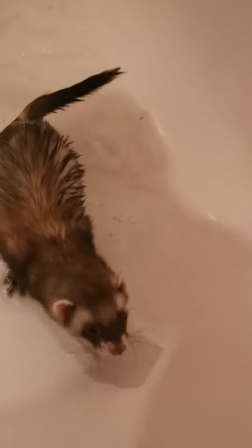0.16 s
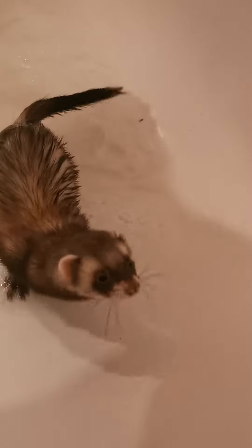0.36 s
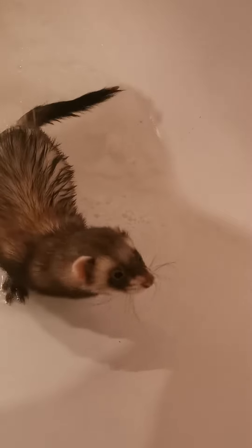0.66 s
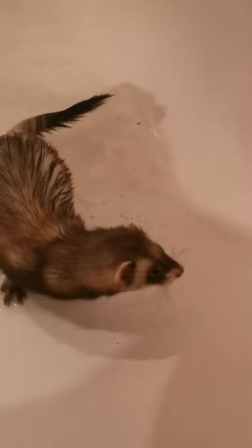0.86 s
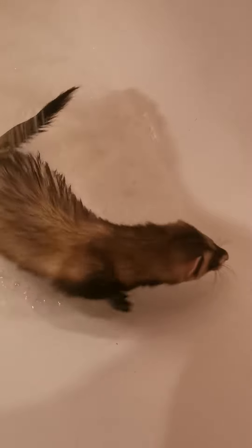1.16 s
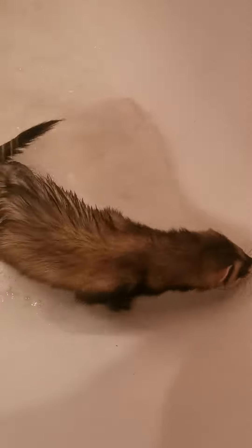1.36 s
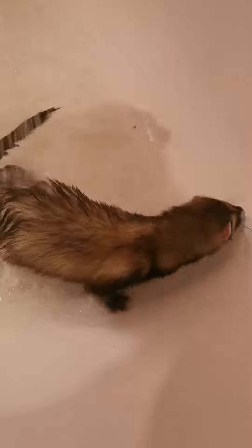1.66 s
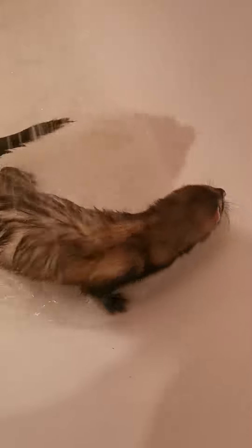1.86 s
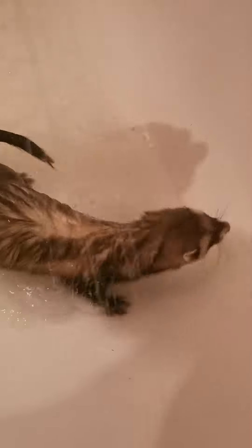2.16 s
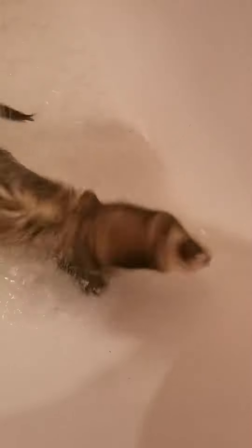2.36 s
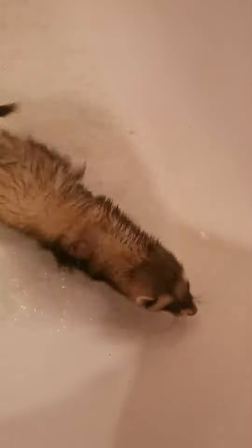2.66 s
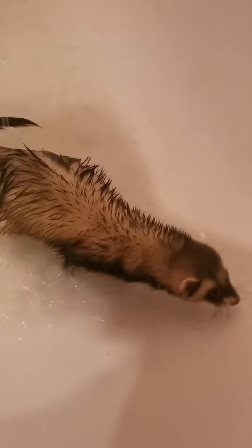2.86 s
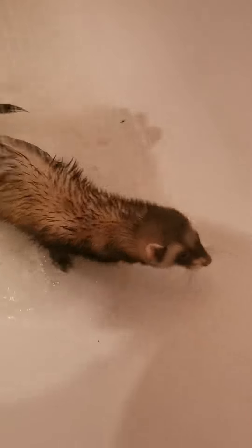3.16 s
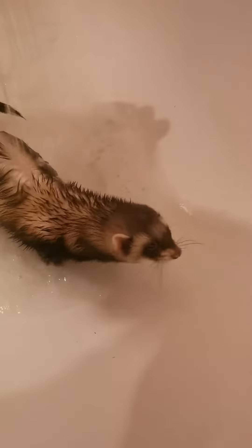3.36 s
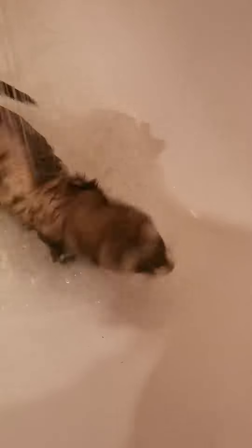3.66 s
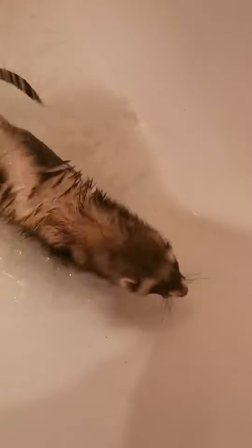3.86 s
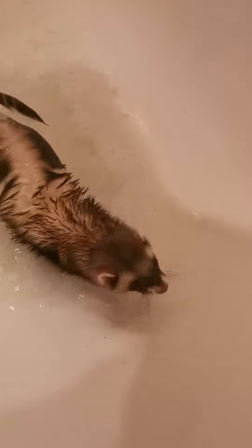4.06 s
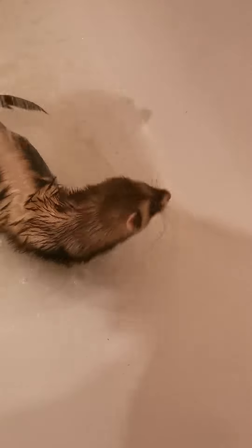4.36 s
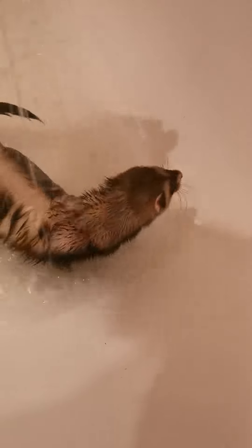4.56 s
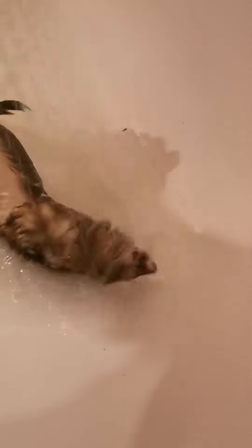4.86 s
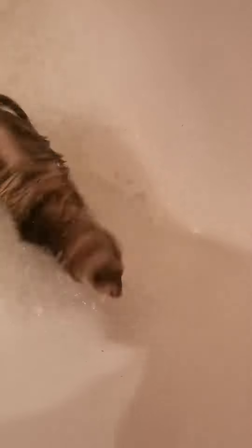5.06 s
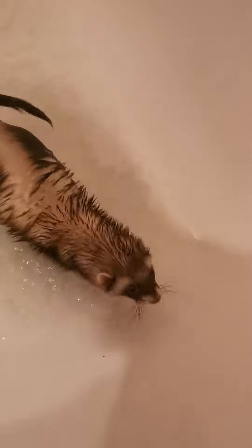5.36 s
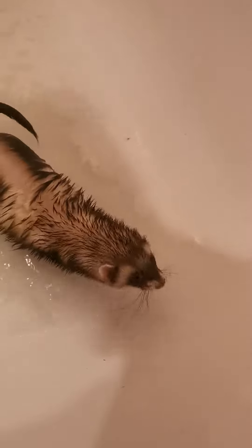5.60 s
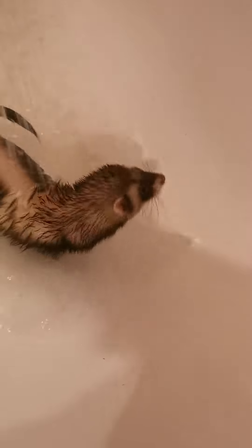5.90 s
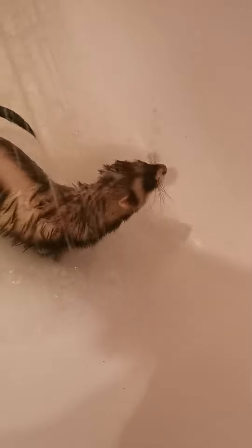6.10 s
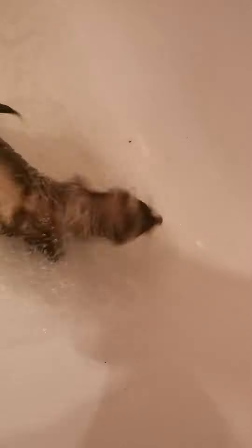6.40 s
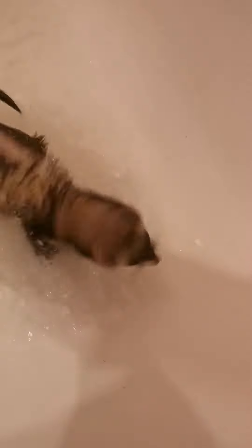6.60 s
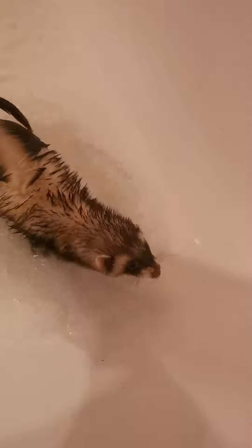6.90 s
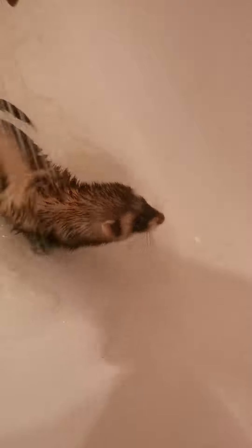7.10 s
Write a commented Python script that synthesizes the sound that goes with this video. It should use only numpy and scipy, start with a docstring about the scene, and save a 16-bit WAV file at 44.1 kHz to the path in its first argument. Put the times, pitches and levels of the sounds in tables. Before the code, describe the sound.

Continuous shower spray in a bathtub, heard close with a short bright room echo. It begins with strong drumming and hiss, thins and becomes muffled around two seconds as fur catches the water, then surges again and keeps fluctuating. Plopping drips, small watery slaps, bubbles and crisp droplet ticks dot it. A deep, steady fan hum and faint handling rumble lie below, with occasional knocks on the tub.

```python
"""In a bathroom with a humming extractor fan, a hand-held shower plays over a small animal in a bathtub.
The wandering jet drums on the tub, splashes in shallow water, hisses on bare floor and is muffled by fur:
random drop impacts are split into coloured stereo bands whose levels follow the jet.
Damped and gliding sines make close ticks, plopping drips, gurgles and knocks on the tub; filtered bursts
make slaps and swishes. Steady tones and filtered noise make the fan, and low noise the handling rumble."""
import sys
import numpy as np
from scipy import signal
from scipy.io import wavfile

SR = 44100
rng = np.random.default_rng(int(sys.argv[2]) if len(sys.argv) > 2 else 0)


def digitize_waveform(pressure):
    """Quantize a signal to 16-bit integers and store it at the path in sys.argv[1].

    Rows of a 2-D input are taken as channels; values are limited to [-1, 1].
    """
    field = np.atleast_2d(pressure).T
    bounded = np.clip(field, -1, 1)
    quanta = np.round(bounded * 32767).astype(np.int16)
    wavfile.write(sys.argv[1], SR, quanta)


N = 319284

# colour of fine spray: (frequency [Hz], level per Hz [dB])
SPRAY_COLOUR = [(1500, -5), (3250, -4.5), (3900, 2), (5400, 2), (7050, 3.5), (7600, -1), (10050, -1.5),
                (10600, 1.5), (12600, -2), (13900, -6.5), (15800, -8.5)]
# the jet drums on a patch of the tub: (from [s], to [s], level [dB], pitch of the patch [Hz])
DRUM_ROLLS = [(0.155, 0.723, -38, 1230), (0.715, 1.243, -38, 940), (1.46, 1.492, -35, 1190),
              (2.7, 3.13, -37.5, 960), (3.312, 3.684, -37, 890), (4.275, 4.302, -39, 710),
              (4.61, 4.66, -42, 1190), (5.25, 5.288, -44.5, 1360), (5.475, 5.615, -40, 1250),
              (6.03, 6.1, -43, 1150), (6.365, 6.38, -51, 1090), (6.884, 6.918, -45.5, 1230)]
# resting level of the hiss between the sweeps onto bare floor
HISS_DB = -39


def from_db(db):
    """Decibels to gain."""
    return 10 ** (np.asarray(db) / 20)


def rms_one(x):
    """Scale to unit rms."""
    return x / np.sqrt(np.mean(x ** 2) + 1e-20)


def in_time(rows):
    """Each column of a curve at every sample."""
    s, *columns = np.transpose(rows)
    return [np.interp(np.arange(N) / SR, s, c) for c in columns]


def at_hz(points, hz):
    """Read a spectrum on a log-frequency axis."""
    table_hz, values = np.array(points).T
    return np.interp(np.log(hz), np.log(table_hz), values)


def pan(db):
    """Left and right gains for a level difference; positive leans left."""
    return from_db(np.array([[.5], [-.5]]) * db)


def butter(x, hz, kind, order=2):
    """Butterworth filter."""
    sos = signal.butter(order, np.clip(hz, 10, .48 * SR), kind, fs=SR, output="sos")
    return signal.sosfilt(sos, x + 1e-18)


def drift(rate):
    """Slow random wander with spread 1; a higher rate in Hz wanders faster."""
    step = 40  # samples between the points of the wander
    r = np.exp(-2 * np.pi * rate * step / SR)
    slow = signal.lfilter([1], [1, -2 * r, r * r], rng.standard_normal(N // step + 2002))
    slow = rms_one(slow[2000:])  # without the filter's start-up
    return np.interp(np.arange(N) / step, np.arange(len(slow)), slow)


def swell(start, end, rise_s, fall_s):
    """Eases up to 1 at start, holds until end, eases back to 0."""
    t = np.arange(N) / SR
    ramp = np.clip(np.minimum(1 + (t - start) / rise_s, 1 - (t - end) / fall_s), 0, 1)
    return np.sin(np.pi / 2 * ramp) ** 2


def level_of(swells, resting_db):
    """Level in dB of a resting sound with the power of swells added, each given as (dB, shape)."""
    power = sum((from_db(db) * shape) ** 2 for db, shape in swells)
    return 10 * np.log10(from_db(resting_db) ** 2 + power)


def ring(s, hz, t60, rise=0):
    """A damped sine that starts at time s; its pitch climbs by the share rise within t60."""
    out, start = np.zeros(N), int(s * SR)
    t = np.arange(min(int(2 * t60 * SR), N - start)) / SR
    tone = np.sin(2 * np.pi * hz * t * (1 + .5 * rise * t / t60))
    out[start:start + len(t)] = tone * from_db(-60 * t / t60)
    return out


def chirp(hz, cycles):
    """A tiny bubble swells and dies within a few cycles, rising slightly in pitch; 4 ms long."""
    t = np.arange(int(.004 * SR)) / SR - .0013  # strongest at 1.3 ms
    turns = hz * t
    return np.exp(-(2 * turns / cycles) ** 2) * np.sin(2 * np.pi * turns * (1 + .003 * turns))


def drops(per_s, spread_db):
    """Random impacts, mostly small; each has its own balance and polarity in the two channels."""
    at = np.flatnonzero(rng.random(N) < per_s / SR)
    sizes = from_db(spread_db * np.minimum(rng.exponential(1, N), 5))
    angle = rng.uniform(0, 2 * np.pi, N)[at]
    out = np.zeros((2, N))
    out[:, at] = sizes[at] * np.array([np.cos(angle), np.sin(angle)])
    return rms_one(out)


def bands(spectrum, excite, count):
    """Split an excitation into coloured stereo bands, as (Hz, band); before panning their powers add to 1."""
    # left-right likeness: (frequency [Hz], correlation, limited to -1..1 below [-])
    likeness = [(60, 15), (160, 0.5), (350, 3), (700, 0.1), (1200, 0.5), (1800, -0.3), (3000, 0.08),
                (15000, 0)]
    # stereo balance: (frequency [Hz], left over right [dB])
    balance = [(100, 10), (180, 8), (280, 0), (700, -1), (1400, -5.5), (2800, -0.5), (5000, 2.5), (9000, 1),
               (15000, -3.5)]
    edges = np.geomspace(spectrum[0][0], spectrum[-1][0], count + 1)
    centres = np.sqrt(edges[1:] * edges[:-1])
    gains = from_db(at_hz(spectrum, centres)) * np.sqrt(np.diff(edges))
    gains /= np.linalg.norm(gains)
    for low, high, hz, gain in zip(edges, edges[1:], centres, gains):
        mid, side = butter(excite(), [low, high], "band")
        alike = np.clip(at_hz(likeness, hz), -1, 1)
        both = np.sqrt(1 + alike) * mid + np.sqrt(1 - alike) * side * [[1], [-1]]
        yield hz, gain * rms_one(both) * pan(at_hz(balance, hz))


def bathroom(x, wet_db, wall_hz=7000):
    """Hard walls add a dense, short tail, a little duller than the direct sound."""
    room_t60_s = 0.19
    t = np.arange(SR // 2) / SR
    late = t > .003  # the walls answer after 3 ms
    tail = rng.standard_normal((2, len(t))) * from_db(-60 * t / room_t60_s) * late
    tail = butter(tail / np.linalg.norm(tail[0]), wall_hz, "low", order=1)
    return x + from_db(wet_db) * signal.fftconvolve(x, tail, axes=1)[:, :N]


def around_jet(x, wet_db, count=3):
    """The echoes keep changing as the jet wanders: several room tails are mixed in drifting shares."""
    shares = np.array([drift(2.43) for k in range(count)])
    shares /= np.linalg.norm(shares, axis=0)
    return x + sum(share * (bathroom(x, wet_db) - x) for share in shares)


def fan():
    """The motor hums near 100 Hz with weaker tones above; moving air stirs the room's low resonances."""
    # motor tones: (frequency [Hz], rms level before waver and pan [dB], left over right [dB], waver [dB])
    motor_tones = [(99.7, -31, 4, 1), (174, -63, 4, 7.5), (321.4, -66, -7.5, 2), (458.4, -72, 1, 10),
                   (521.5, -48.5, -10, 0.9), (635, -68, -19, 3.5)]
    # room resonances stirred by the fan: (frequency [Hz], width [Hz], rms level before pan [dB])
    room_modes = [(88.2, 6.8, -44), (121.9, 12.7, -44.5), (146.4, 6.5, -49.5)]
    # colour of the moving air: (frequency [Hz], level per Hz [dB])
    air_colour = [(60, 6.5), (150, 11.5), (240, -10), (330, 2), (450, 2), (800, -2), (2000, -69)]
    t = np.arange(N) / SR
    hum = 0
    for hz, db, side_db, waver_db in motor_tones:
        tone = np.sqrt(2) * np.sin(2 * np.pi * (hz * t + rng.random()))
        hum = hum + tone * from_db(db + waver_db * drift(1.97)) * pan(side_db)
    boom = 0
    for hz, width, db in room_modes:
        mode = butter(rng.standard_normal(N), [hz - width / 2, hz + width / 2], "band")
        boom = boom + from_db(db) * rms_one(mode)
    air = sum(band for hz, band in bands(air_colour, lambda: rng.standard_normal((2, N)), count=10))
    return hum + boom * pan(2.6) + from_db(-47.5) * air


def handling():
    """The hand on the microphone rumbles faintly, as low band noise that swells when the grip shifts."""
    # shifts of the hand: (from [s], to [s], level [dB])
    grip_shifts = [(2.4, 2.65, -52), (3.65, 3.9, -51), (5.05, 5.25, -48), (6.5, 6.8, -54)]
    fade_s, holding_db = 0.11, -57.5
    grips = [(db, swell(start, end, fade_s, fade_s)) for start, end, db in grip_shifts]
    # a part shared by both channels and a part of each one's own
    rumble = rng.standard_normal(N) + 0.43 * rng.standard_normal((2, N))
    rumble = rms_one(butter(rumble, [36, 72], "band"))
    return from_db(level_of(grips, holding_db)) * rumble * pan(3.9)


def thrum(hiss_db):
    """Water on the animal's body thrums dully; the more of the jet hisses on bare floor, the less is left."""
    resting_db, loss_per_hiss_db = -54, 2.7
    left, right = butter(drops(per_s=500, spread_db=3.0), (172, 310), "band", order=3)
    dull = rms_one(left + .5 * right * [[1], [-1]])
    return dull * from_db(resting_db - loss_per_hiss_db * np.maximum(hiss_db - HISS_DB, 0))


def knocks(thump_t60=0.005, wall_db=-11, lowest_hz=450):
    """Each blow is a short thump and rings the tub wall; a soft contact leaves out the upper modes."""
    # blows on the tub: (time [s], peak level before pan and room [dB], pitch of the contact [Hz])
    blows = [(0.7162, -22, 1040), (2.5583, -21, 940), (2.57, -19.5, 900), (5.1712, -16.5, 2680),
             (5.329, -24.5, 2760)]
    # modes of the tub wall: (frequency [Hz], relative level [dB], decay by 60 dB [s])
    wall_modes = [(460, -19, 0.026), (636, -17, 0.013), (930, -2.5, 0.024), (1470, 1, 0.019),
                  (2290, -30, 0.036), (2870, -6.5, 0.028)]
    out = 0
    for s, db, contact_hz in blows:
        wall = sum(rng.choice([-1, 1]) * from_db(mode_db) * ring(s, hz, t60)
                   for hz, mode_db, t60 in wall_modes)
        blow = ring(s, contact_hz, thump_t60) + from_db(wall_db) * wall
        blow = butter(blow, 2 * contact_hz, "low")
        blow = butter(blow, lowest_hz, "high")
        out = out + from_db(db) * blow / np.abs(blow).max()
    return bathroom(out * pan(-2.2), wet_db=4.0)


def plops(rise=0.02, splat=0.32, splat_t60=0.034):
    """A fat drip splats and traps a larger bubble, whose pitch climbs as it nears the surface."""
    # drips in the shallow water: (time [s], relative level [dB], pitch [Hz], decay by 60 dB [s])
    drips = [(1.711, -25.5, 1144, 0.048), (1.9, -33, 1570, 0.034), (2.067, -37, 1443, 0.15),
             (2.203, -28, 1570, 0.031), (2.338, -21.5, 1086, 0.038), (2.363, -35, 1040, 0.05),
             (3.004, -26, 866, 0.042), (3.902, -29.5, 1313, 0.087), (4.773, -24.5, 1067, 0.061),
             (4.788, -28, 1025, 0.05), (4.843, -29.5, 1350, 0.032), (5.109, -21, 1386, 0.04),
             (5.81, -30, 1030, 0.094)]
    out, t = np.zeros(N), np.arange(N) / SR
    for s, db, hz, t60 in drips:
        decay = (t > s) * from_db(-60 * np.clip((t - s) / splat_t60, 0, 5))
        spatter = rng.standard_normal(N) * np.sqrt(SR / hz) * decay
        drip = butter(ring(s, hz, t60, rise) + splat * spatter, [.8 * hz, 1.3 * hz], "band")
        out = out + from_db(db - 5.5) * drip
    return bathroom(out * pan(-2.8), wet_db=-2.5)


def slaps():
    """A gout of water slaps into the puddle as a quick, dying run of droplets popping around one pitch."""
    # gouts: (time [s], rms level at the start before pan and room [dB], pitch [Hz])
    gouts = [(0.869, -29.5, 930), (0.942, -29.5, 1010), (1.203, -30, 940), (1.424, -37, 1390),
             (1.733, -34.5, 2370), (3.3, -36, 1440), (4.53, -36, 2200), (4.948, -35.5, 2350),
             (5.176, -38, 2600), (5.332, -30.5, 2570), (5.466, -33.5, 1660), (5.518, -38, 1540),
             (6.015, -35, 2150), (6.036, -30, 1410), (6.255, -33.5, 945), (6.328, -35.5, 1250),
             (6.372, -31, 1120), (6.409, -39, 1140)]
    t60_s, octaves = 0.18, 0.8
    half = 2 ** (octaves / 2)
    out, t = np.zeros((2, N + SR)), np.arange(SR // 4) / SR
    droplets = drops(per_s=2800, spread_db=1.0)
    for s, db, hz in gouts:
        start = int(s * SR)
        run = np.roll(droplets, -start, axis=1)[:, :len(t)]
        run = rms_one(butter(run, [hz / half, hz * half], "band"))
        out[:, start:start + len(t)] += from_db(db - 60 * t / t60_s) * run
    return bathroom(out[:, :N] * pan(-1.0), wet_db=-2)


def swishes(width_octaves=0.11):
    """Over a thin film, tiny bubbles of nearly one size fizz together; the pitch climbs as it thins."""
    # crossings of the film: (from [s], to [s], level [dB], first pitch [Hz], last pitch [Hz])
    film_crossings = [(3.96, 4.006, -46, 4870, 4900), (6.03, 6.332, -46.5, 4400, 6100)]
    fade_s = 0.035
    glide, strength = [], 0
    for start, end, db, first_hz, last_hz in film_crossings:
        glide += [(start, first_hz), (end, last_hz)]
        strength = strength + from_db(db) * swell(start, end, fade_s, fade_s)
    centre, = in_time(glide)
    out = 0
    for hz, band in bands(SPRAY_COLOUR[1:6], lambda: drops(per_s=1700, spread_db=6.5), count=10):
        nearness = np.exp(-.5 * (np.log2(hz / centre) / width_octaves) ** 2)
        out = out + band / band.std() * nearness
    return rms_one(out) * strength


def pockets():
    """Drops keep ringing the air pocket dug by the jet, whose pitch slides as its size changes."""
    # pockets: (from [s], to [s], level [dB], first pitch [Hz], last pitch [Hz], width [Hz])
    air_pockets = [(0.75, 1.278, -42, 905, 865, 85), (1.798, 2.078, -51.5, 1540, 1510, 130),
                   (3.537, 3.74, -46.5, 905, 735, 80), (4.017, 4.167, -41, 2110, 1900, 600),
                   (4.158, 4.283, -37.5, 1310, 900, 480), (4.44, 4.65, -47, 1550, 1310, 450),
                   (5.507, 5.597, -40.5, 1450, 1050, 380), (6.06, 6.355, -48, 2320, 2250, 550),
                   (6.192, 6.225, -39.5, 1520, 1580, 300)]
    fade_s = 0.05
    out, t = np.zeros((2, N)), np.arange(N) / SR
    pelting = drops(per_s=1600, spread_db=2.0)
    for start, end, db, first_hz, last_hz, width_hz in air_pockets:
        shape = swell(start, end, fade_s, fade_s)
        on = shape > 0
        pitch = np.interp(t[on], [start, end], [first_hz, last_hz])
        turn = np.exp(2j * np.pi * np.cumsum(pitch) / SR)
        # shift the pitch to zero, filter, shift back: a band that glides
        rung = butter(pelting[:, on] / turn, width_hz / 2, "low") * turn
        out[:, on] += from_db(db) * shape[on] * rms_one(rung.real)
    return out * pan(-2.5)


def gurgles(splash_db, per_s=45, gain_db=0.5, spread_db=5.5, lowest_hz=1200, octaves=2.5, cycles=45, rise=0.2):
    """Some of the splashes trap a bubble that rings on its own and climbs in pitch."""
    gap, size, pitch, side = rng.random((700, 4)).T
    times = np.cumsum(-np.log(gap)) / per_s
    out = np.zeros((2, N + SR))
    for s, big, high, right in zip(times, size, pitch, side):
        start, hz = int(s * SR), lowest_hz * 2 ** (octaves * high)
        if start < N:
            # age runs from 0 to 1 over the bubble's life
            age = np.arange(int(cycles / hz * SR)) * hz / (cycles * SR)
            bubble = np.sin(2 * np.pi * cycles * age * (1 + .5 * rise * age)) * from_db(-60 * age)
            db = splash_db[start] + gain_db - spread_db * np.log(big + 0.12)
            out[:, start:start + len(age)] += from_db(db) * pan(4 - 12 * right) * bubble
    return bathroom(out[:, :N], wet_db=5.0)


def ticks(spray_db, cycles=8.7, per_s=45, small_db=-1.0, spread_db=2.0, snap=0.47, snap_hz=11200, snap_cycles=2.4):
    """Drops burst close by: set loud ones, and many small ones that fade when the spray is muffled.
    The finer the drop, the harder the snap of its impact."""
    # loud drops: (time [s], relative level [dB], pitch [Hz], relative left over right [dB])
    loud_drops = [(0.0817, -19, 12400, -10), (0.1072, -19, 10800, -8), (0.2314, -17.5, 6570, -4.0),
                  (0.6085, -18.5, 6750, -6), (0.6843, -19, 11000, -8), (1.6307, -22, 10800, -4),
                  (1.8567, -26.5, 4280, 0), (2.1954, -30.5, 4000, -9), (2.2318, -25, 11600, -10),
                  (2.2822, -21, 11300, -14), (2.3431, -23.5, 4180, -8.5), (2.4853, -23.5, 10700, -11),
                  (2.5272, -21.5, 6540, -2), (2.6435, -20.5, 4700, -1), (2.9088, -23, 10800, -4),
                  (3.0555, -26.5, 4980, -3), (3.4007, -26, 3620, -3), (3.8427, -17.5, 6100, 11),
                  (3.8896, -19.5, 10700, -3), (3.9389, -22, 6640, 5), (4.348, -22.5, 3300, 2),
                  (4.7102, -21.5, 6330, -2), (4.803, -26.5, 6300, -10), (4.808, -23, 11400, -13),
                  (4.853, -26, 6330, -13), (5.5278, -20, 7100, -3.5), (5.8042, -19, 12300, -10),
                  (6.1809, -24.5, 4800, 2), (6.2682, -22, 5640, -8.0), (6.2851, -18, 6400, -7),
                  (6.536, -25, 7000, -6), (6.6787, -23, 10700, -9), (6.7052, -17.5, 10600, -14),
                  (7.0718, -23, 4200, -1)]
    loud_gain_db, loud_side_db = -3, -4.5
    pitches = np.array(loud_drops)[:, 2]
    gap, size, pitch, side = rng.random((1000, 4)).T
    times = np.cumsum(-np.log(gap)) / per_s
    local_db = np.interp(times * SR, np.arange(N), np.minimum(spray_db, HISS_DB + 2))
    peak_db = local_db + small_db - spread_db * np.log(size + .02)
    # small drops draw their pitches from the spread of the loud ones
    small = np.c_[times, peak_db, np.quantile(pitches, pitch), 24 * side - 15][times < N / SR]
    loud = [(s, db + loud_gain_db, hz, side_db + loud_side_db) for s, db, hz, side_db in loud_drops]
    out = np.zeros((2, N + SR))
    for s, db, hz, side_db in np.vstack([loud, small]):
        start = int(s * SR)
        burst = chirp(hz, cycles) + snap * hz / pitches.max() * chirp(snap_hz, snap_cycles)
        out[:, start:start + len(burst)] += from_db(db) * pan(side_db) * burst
    return bathroom(out[:, :N], wet_db=-1.5)


def splashing(level_db, flutter_db=2.5):
    """Water falls into water and leaves short-lived pops of many sizes, made of fluttering impact bands."""
    # colour of the splashes: (frequency [Hz], level per Hz [dB])
    splash_colour = [(700, -42), (1200, 0), (1600, 2.5), (1950, 0), (2400, 5), (3100, -1), (4500, -6.5),
                     (7000, -5)]
    pops = bands(splash_colour, lambda: drops(per_s=1000, spread_db=3.0), count=14)
    out = sum(band * from_db(flutter_db * drift(18.4)) for hz, band in pops)
    return rms_one(around_jet(out, wet_db=-7.0)) * from_db(level_db + 1.5)


def patch_pitch():
    """The pitch holds during a roll and glides to that of the next patch."""
    return in_time([(s, hz) for start, end, db, hz in DRUM_ROLLS for s in (start, end)])[0]


def drumming(level_db, focus_db=5.0, focus_octaves=0.41, flutter_db=2.5):
    """Heavy drops thud on the tub; the patch under the jet favours its own pitch."""
    # colour of the thuds: (frequency [Hz], level per Hz [dB])
    drum_colour = [(250, -5), (360, -2), (600, 2), (900, 2.5), (1350, -2), (1800, -4), (2800, -23)]
    pitch = patch_pitch()
    out, power = 0, 0
    for hz, band in bands(drum_colour, lambda: drops(per_s=700, spread_db=3.0), count=12):
        favour = from_db(focus_db * np.exp(-.5 * (np.log2(hz / pitch) / focus_octaves) ** 2))
        out = out + band * favour * from_db(flutter_db * drift(4.7))
        power = power + band.var() * favour ** 2
    even = out / np.sqrt(power)  # the favoured pitch does not change the loudness
    return rms_one(around_jet(even, wet_db=-5)) * from_db(level_db - 0.36)


def spray(level_db, flutter_db=1.98, crack=1.11, mist=0.68, top_hz=7600):
    """Fine drops crack on the hard tub and fizz in a mist, while treble share and side follow set curves."""
    # side on which the spray lands: (time [s], left over right [dB])
    landing_side = [(0.0, -5.5), (1.31, -2.5), (1.59, -6), (1.93, -2), (2.26, -13), (2.28, -9), (2.4, -6),
                    (3.41, -0.5), (4.66, -2.5), (4.76, -2), (4.8, -8), (5.08, -6), (5.79, -2), (6.73, -6.5),
                    (7.24, -3.5)]
    # power share of the bands above top_hz, set against its mean below: (time [s], level [dB])
    top_share = [(0.0, -1.5), (0.95, -3.5), (1.45, -3.5), (1.75, -2), (2.0, -1.5), (2.25, -2), (2.55, -2.5),
                 (2.9, -2), (3.25, -3.5), (3.55, -2), (4.25, -3), (4.8, -2), (5.05, -3), (5.85, -1),
                 (6.1, -3.5), (6.35, -3.5), (6.65, -1.5), (7.24, -2)]
    impacts = drops(per_s=2200, spread_db=11.0)

    def fizz():
        """Shared cracks with fresh small drops and mist for each band."""
        return crack * impacts + drops(per_s=1200, spread_db=3.0) + mist * rng.standard_normal((2, N))

    side_db, = in_time(landing_side)
    top_db, = in_time(top_share)
    top = np.clip(from_db(top_db) ** 2, .02, .9)
    bright = np.sqrt(top / top.mean())
    dull = np.sqrt((1 - top) / (1 - top.mean()))
    out = 0
    for hz, band in bands(SPRAY_COLOUR, fizz, count=32):
        share = bright if hz > top_hz else dull
        out = out + band * share * from_db(flutter_db * drift(12.0))
    return rms_one(bathroom(out, wet_db=-10.0)) * from_db(level_db - 0.7) * pan(side_db)


def fur_loss():
    """Loss in dB while the jet is caught by the animal's fur, which muffles the water."""
    # jet on the fur: (from [s], to [s], loss [dB])
    on_fur = [(1.616, 1.76, 3.5), (1.937, 2.04, 7.5), (2.108, 2.34, 9.5), (3.16, 3.22, 2.5),
              (3.87, 3.92, 2), (4.686, 4.717, 3), (4.823, 4.922, 5), (5.865, 5.916, 4), (6.503, 6.653, 9.5),
              (7.112, 7.145, 5.5)]
    enter_s, leave_s = 0.067, 0.057
    return sum(loss_db * swell(start, end, enter_s, leave_s) for start, end, loss_db in on_fur)


def hiss_level(fur_db):
    """Level in dB of the hiss, which swells as the jet sweeps onto bare floor.
    Fur lowers its resting level by a quarter of the fur loss in dB."""
    # sweeps onto the floor: (from [s], to [s], level [dB], time to move off [s])
    floor_sweeps = [(0.127, 0.303, -31.5, 0.45), (0.547, 0.932, -34.5, 0.17), (1.448, 1.518, -32.5, 0.2),
                    (2.698, 2.833, -32, 0.41), (3.443, 3.503, -49, 0.99), (4.24, 4.24, -37, 0.29),
                    (5.07, 5.088, -37.5, 0.26), (5.344, 5.687, -32.5, 0.22), (6.72, 6.98, -34, 0.18)]
    rise_s = 0.23
    sweeps = [(db, swell(start, end, rise_s, fall_s)) for start, end, db, fall_s in floor_sweeps]
    return level_of(sweeps, HISS_DB - 0.25 * fur_db)


def drum_level(fur_db):
    """Level in dB of the drumming: a resting level with rolls, less the loss to fur."""
    resting_db, rise_s, fall_s = -46, 0.25, 0.21
    rolls = [(db, swell(start, end, rise_s, fall_s)) for start, end, db, hz in DRUM_ROLLS]
    return level_of(rolls, resting_db) - fur_db


def splash_level(fur_db):
    """Level in dB of the splashing, which surges and sinks as the shallow water is stirred."""
    # sloshes: (time [s], added level [dB])
    sloshes = [(1.53, 2), (1.75, 0), (2.72, 7), (2.93, 4.5), (3.32, -6), (3.52, 2), (4.05, -0.5), (4.22, 3),
               (4.53, 2), (4.98, 2), (5.27, 5), (5.7, 2.5), (6.05, 0.5), (6.33, -2.5), (6.8, 4), (7.0, 4)]
    resting_db, rise_s, fall_s = -43, 0.15, 0.13
    return resting_db - fur_db + sum(db * swell(s, s, rise_s, fall_s) for s, db in sloshes)


def scene():
    """The wandering jet shares its water between tub floor, puddle and fur, over the steady fan."""
    fur_db = fur_loss()
    hiss_db = hiss_level(fur_db)
    splash_db = splash_level(fur_db)
    background = fan() + handling()
    details = thrum(hiss_db) + knocks() + plops() + slaps() + swishes() + pockets()
    bubbles = gurgles(splash_db) + ticks(hiss_db)
    jet = splashing(splash_db) + drumming(drum_level(fur_db)) + spray(hiss_db)
    return background + details + bubbles + jet


def record(dry):
    """An elliptic low-pass cuts the top steeply."""
    cutoff_hz = 15800
    return signal.sosfilt(signal.ellip(12, .2, 80, cutoff_hz, fs=SR, output="sos"), dry)


dry = scene()
out = record(dry)
digitize_waveform(out)
```